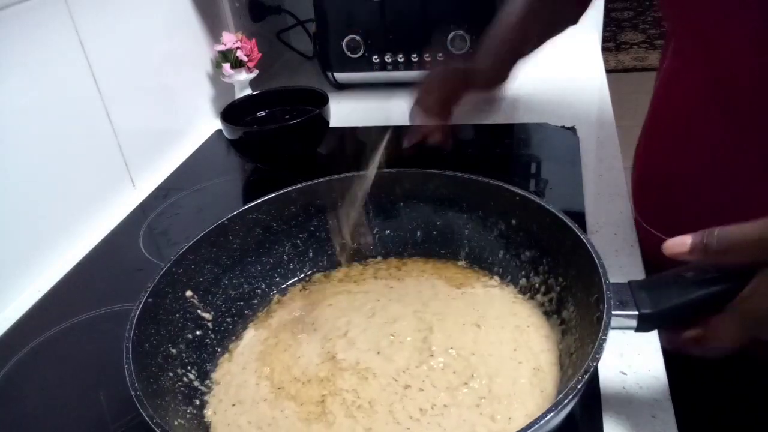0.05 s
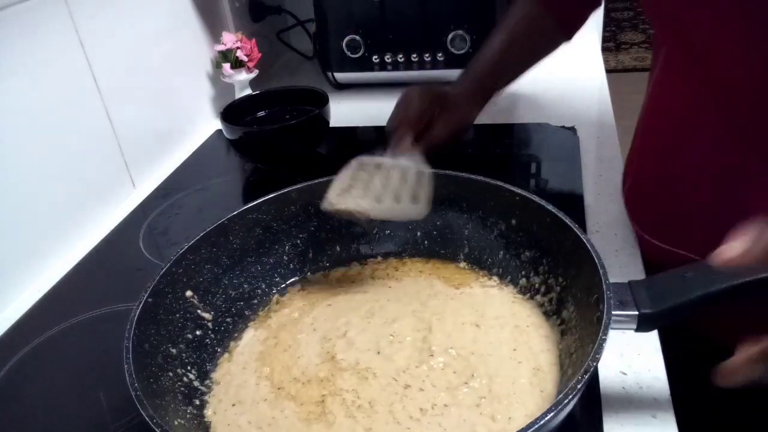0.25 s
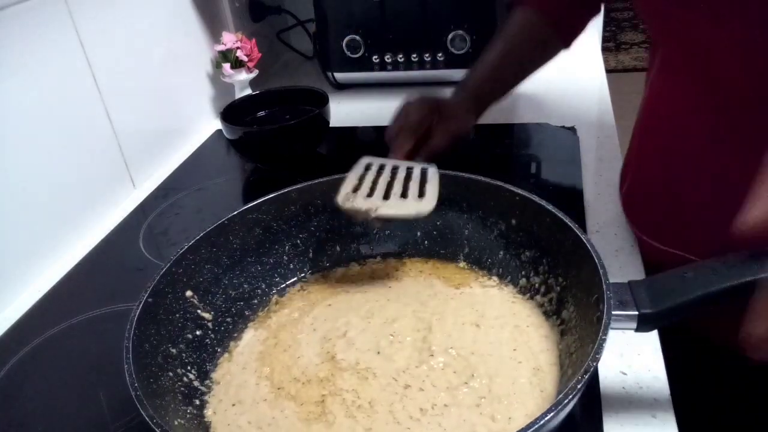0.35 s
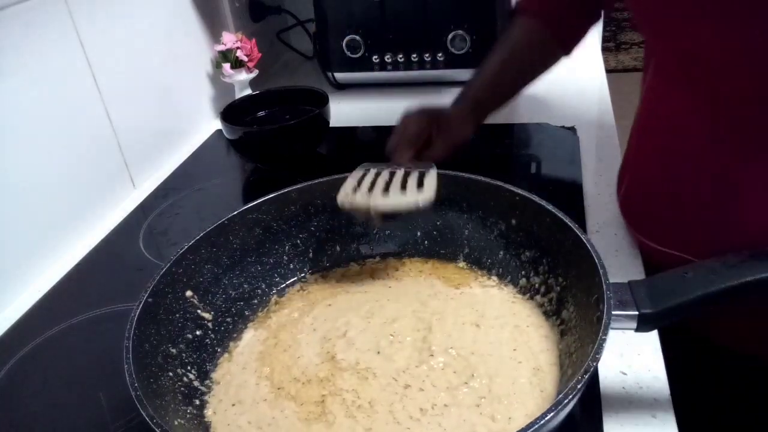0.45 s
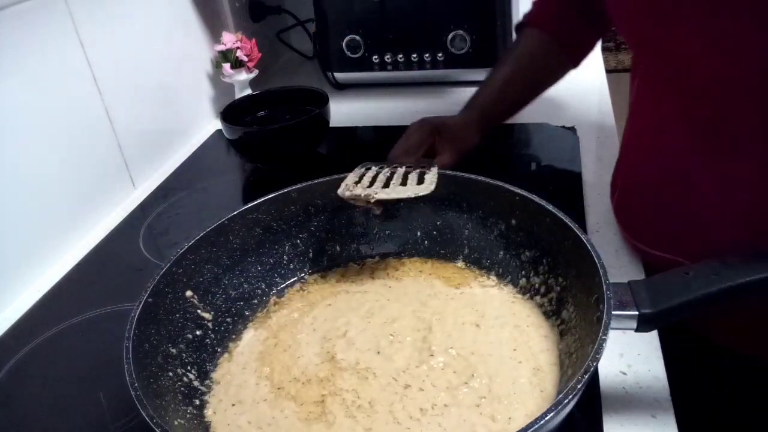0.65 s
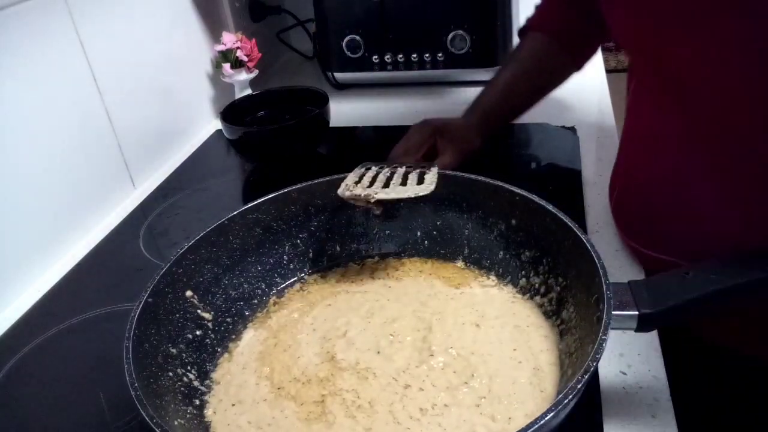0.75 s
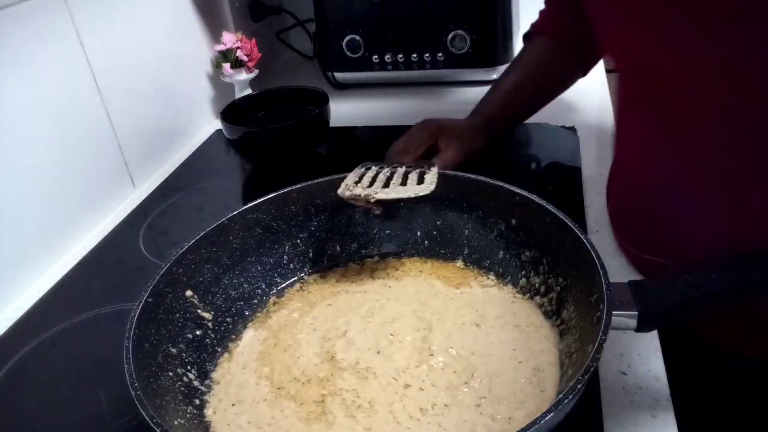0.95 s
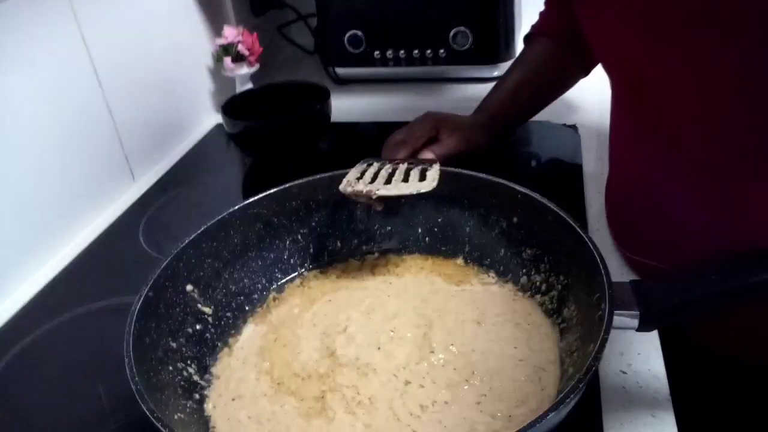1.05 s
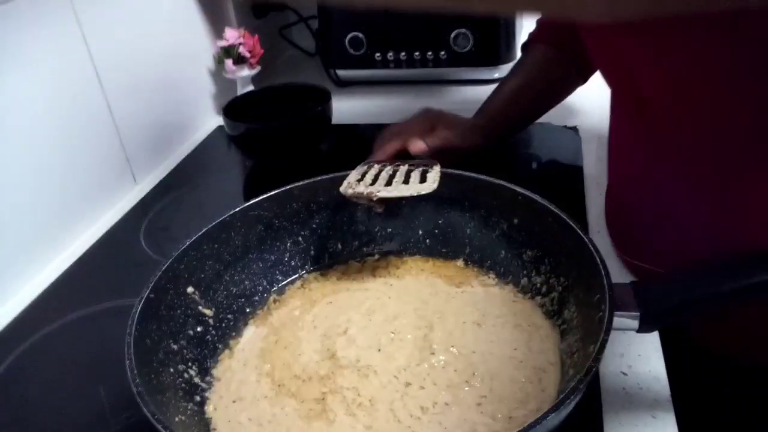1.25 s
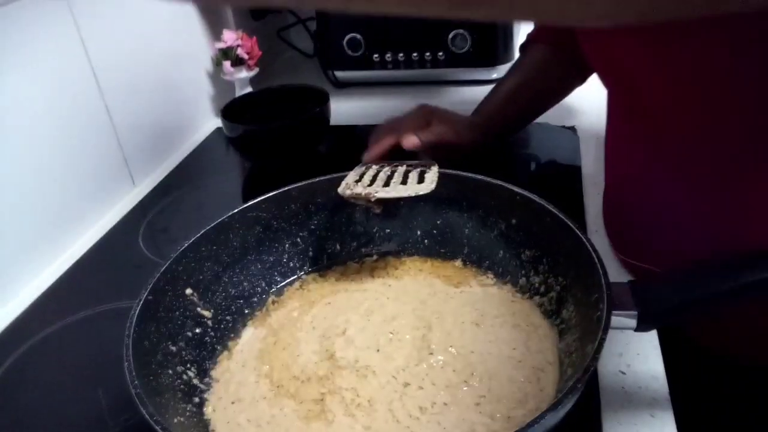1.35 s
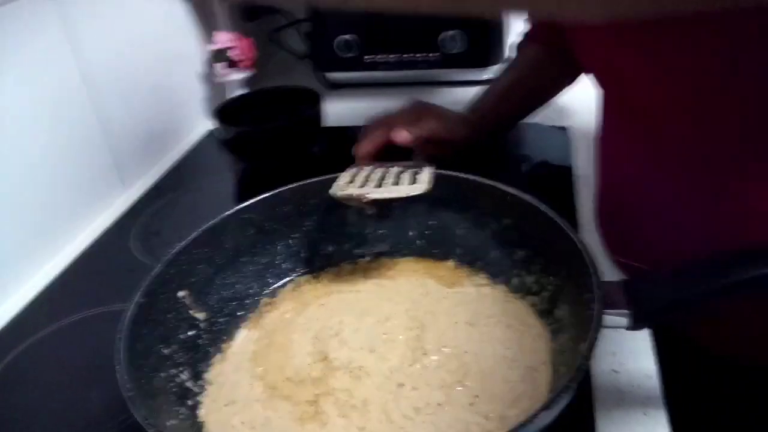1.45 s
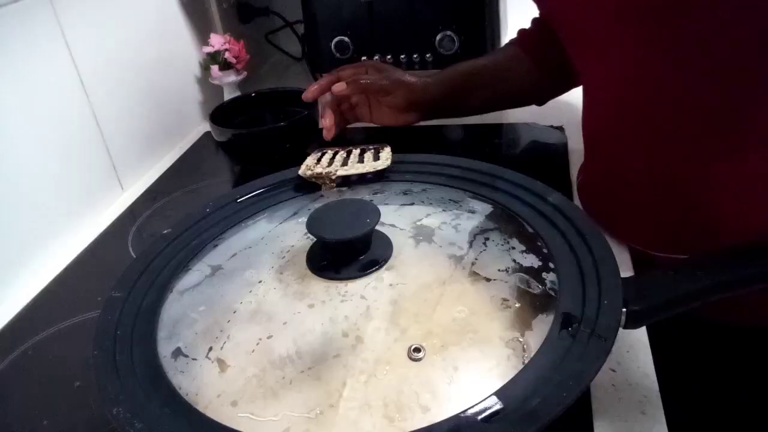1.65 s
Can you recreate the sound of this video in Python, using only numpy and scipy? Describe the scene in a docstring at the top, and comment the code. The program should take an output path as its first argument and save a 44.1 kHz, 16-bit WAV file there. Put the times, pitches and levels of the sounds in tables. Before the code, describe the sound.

Sharp clatter of a steel spatula bouncing on a frying pan rim, followed at once by a bright rattling lid, with soft stovetop thuds; then low kitchen hum and faint touches, heard close with a short room tail.

```python
"""A faint hollow clink opens over mains hum and a thin whine in a kitchen; a steel spatula is laid on a pan's rim
and bounces, its handle clacks, a lid clatters down, and later fingers nudge things.
Each blow rings decaying modes and throws off a grainy noise crack; thuds ring the hob and a low boom swells.
The hum beats with a fan tone over hiss, rumble and wavering tones; an edit at 1.34 s makes the hum jump."""
import sys
import numpy as np
from scipy import signal
from scipy.fft import rfft, irfft
from scipy.io import wavfile

SR = 44100
rng = np.random.default_rng(int(sys.argv[2]) if len(sys.argv) > 2 else 0)


def store_wav(level_fs):
    """Save 16-bit WAV to argv[1]."""
    pcm = np.round(np.clip(np.atleast_2d(level_fs), -1, 1) * 32767)
    wavfile.write(sys.argv[1], SR, pcm.T.astype(np.int16))


def undo_db(level):
    """Turn decibels back into plain size, where 20 dB means ten times bigger."""
    steps = np.asarray(level, float) / 20
    return 10 ** steps


N = 74970
T = np.arange(N) / SR
EDIT_S = 1.3396
AFTER_EDIT = T > EDIT_S

# Crack colour of pan, handle and two light touches: pitch_hz [Hz], relative_db [dB per Hz]
PAN_CRACK = [(180, -30.5), (300, -12), (798, -19.5), (1290, -6), (1630, -22), (2550, -10), (2960, -22.5),
             (5380, -20), (6040, -11.5), (8140, -35), (13000, -50), (15000, -32.5), (15900, -59.5)]
# Crack colour of lid and metal tap: pitch_hz [Hz], relative_db [dB per Hz]
LID_CRACK = [(180, -23.5), (300, -12.5), (432, -12.5), (1110, -11.5), (1870, -16), (3800, -14),
             (4400, -13.5), (4850, -15), (5300, -0.5), (5750, -12), (6450, -1.5), (6800, -9), (7450, -5.5),
             (7700, -15), (12400, -22), (14900, -10.5), (15600, -7), (15900, -50)]


def colour(x, spectrum):
    """Filter x to a spectrum of (Hz, relative dB) points joined over log frequency; rms 1."""
    hz, db = np.array(spectrum, float).T
    f = np.fft.rfftfreq(len(x), 1 / SR) + 1
    gain = undo_db(np.interp(np.log(f), np.log(hz), db, left=-90, right=-90))
    y = irfft(rfft(x) * gain, len(x))
    return y / np.std(y)


def band(centre_hz, width_hz):
    """Noise through a steep resonance whose gain halves at the edges of its width; rms 1."""
    f = np.fft.rfftfreq(N, 1 / SR) + 1
    gain = 1 / (1 + ((f - centre_hz) / (width_hz / 2)) ** 2)
    y = irfft(rfft(rng.standard_normal(N)) * gain, N)
    return y / np.std(y)


def fade(start_s, t60_s, attack_s=0.0003):
    """Quick rise at the start, then exponential decay by 60 dB per t60."""
    since = np.maximum(T - start_s, 0)
    return (1 - np.exp(-since / attack_s)) * np.exp(-np.log(1000) * since / t60_s)


def ring(modes, start_s, level_db, bright_hz, contact_s=0.001):
    """One blow on a set of modes, each wavering against a close twin; a soft blow weakens the high modes."""
    scatter_db, twin_hz, twin_share, longest_t60_s = 4, 20, .25, .3
    hz, mode_db, t60_s = np.array(modes, float).T[:, :, None]
    start = int(start_s * SR)
    since = np.arange(min(N - start, SR // 2)) / SR
    gain = undo_db(level_db + mode_db + scatter_db * rng.standard_normal(hz.shape))
    gain = gain / (1 + (hz / bright_hz) ** 2)
    # the twin's random detuning has this spread at 1 kHz and grows with the root of pitch
    twin = hz + twin_hz * np.sqrt(hz / 1000) * rng.standard_normal(hz.shape)
    tone = np.sin(2 * np.pi * hz * since) + twin_share * np.sin(2 * np.pi * twin * since)
    decay = np.exp(-np.log(1000) * since / np.minimum(t60_s, longest_t60_s))
    onset = 1 - np.exp(-(since / contact_s) ** 2)
    out = np.zeros(N)
    out[start:start + len(since)] = np.sum(gain * tone * decay, 0) * onset
    return out


def clatter(blows, modes, crack_colour):
    """Each blow rings the modes and throws off a crack of coloured noise with random grain."""
    grain_db = 1.5
    out = 0
    for start_s, ring_db, crack_db, bright_hz, t60_s in blows:
        grain = undo_db(grain_db * np.repeat(rng.standard_normal(N // 64 + 1), 64)[:N])
        noise = colour(grain * rng.standard_normal(N), crack_colour)
        noise = signal.lfilter(*signal.butter(1, min(bright_hz, 20000), fs=SR), noise)
        crack = undo_db(crack_db) * noise * fade(start_s, t60_s)
        out = out + ring(modes, start_s, ring_db, bright_hz) + crack
    return out


def spatula_on_pan():
    """The spatula bounces on the rim, ringing the modes of pan and spatula."""
    # Mode pitches: pitch_hz [Hz]
    pan_hz = [920, 1019, 1150, 1275, 1757, 2150, 2237, 2509, 2715, 3135, 3774, 4145, 4450, 5992, 6700, 7321,
              8909, 10830]
    # Those modes, decay capped in ring(): relative_db [dB], t60_s [s]
    pan_modes = [(-15.5, 0.047), (-8, 0.078), (-4, 0.1), (-3.5, 0.24), (-7.5, 0.16), (-2, 0.1),
                 (-7.5, 0.37), (-0.5, 0.16), (-3.5, 0.11), (-21, 0.082), (-12.5, .11), (-6.5, .12),
                 (-18, 0.053), (-2.5, 0.077), (-16, 0.18), (-18, 0.095), (-32, .1), (-30, 0.081)]
    # Blows: start_s [s], ring_db [dB], crack_db [dB], bright_hz [Hz], crack_t60_s [s]
    pan_blows = [(.2185, -23, -23, 12050, 0.034), (.2222, -35, -18.5, 12000, 0.04),
                 (.3085, -44, -29.5, 2547, 0.084), (.3135, -42.5, -40, 5000, 0.12),
                 (.336, -41.5, -38.5, 1200, 0.069)]
    return clatter(pan_blows, np.c_[pan_hz, pan_modes], PAN_CRACK)


def spatula_handle():
    """The handle clacks as the spatula rocks, ringing a few middle modes."""
    # Modes: pitch_hz [Hz], relative_db [dB], t60_s [s]
    handle_modes = [(650, -8, .08), (785, 0, .14), (1040, -4, .12), (1130, -2, .08), (1770, -6, .09)]
    # Rocks: start_s [s], ring_db [dB], crack_db [dB], bright_hz [Hz], crack_t60_s [s]
    rocks = [(.3085, -40, -49, 5006, .03), (.335, -41.5, -53, 5000, 0.041)]
    return clatter(rocks, handle_modes, PAN_CRACK)


def lid():
    """The lid clatters down in quick blows that ring its dense high modes."""
    # Mode pitches: pitch_hz [Hz]
    lid_hz = [1040, 1120, 2700, 3200, 4459, 5230, 5327, 5459, 6334, 6391, 6455, 6513, 6867, 7007, 7137,
              7450, 14600, 15100]
    # Those modes, decay capped in ring(): relative_db [dB], t60_s [s]
    lid_modes = [(-17, 0.22), (-14.5, 0.078), (-23, .3), (-23.5, 0.33), (-4, 0.11), (-8, 0.13),
                 (-7.5, 0.067), (-15.5, 0.06), (-9.5, .2), (-8.5, .2), (-9, 0.28), (0.5, 0.088),
                 (-14, 0.23), (-9, .15), (-4.5, 0.065), (-9, 0.13), (-15, .1), (-14, .1)]
    # Blows: start_s [s], ring_db [dB], crack_db [dB], bright_hz [Hz], crack_t60_s [s]
    lid_blows = [(.4028, -34.5, -18, 12000, 0.035), (.406, -21.5, -17, 12000, 0.067),
                 (.4115, -28, -24.5, 12000, .1), (.421, -45.5, -27, 12000, 0.22),
                 (.437, -41.5, -22.5, 12000, .08), (.4435, -39.5, -27.5, 12000, .12),
                 (.458, -44, -36, 9000, 0.088)]
    return clatter(lid_blows, np.c_[lid_hz, lid_modes], LID_CRACK)


def hob_thuds():
    """Soft, slow contacts ring the glass hob under the pan, thinned by the microphone's low cut."""
    mic_low_hz = 60
    # Plate modes, decay capped in ring(): pitch_hz [Hz], relative_db [dB], t60_s [s]
    hob_modes = [(73.48, -4.5, .12), (168.3, -0.5, 0.22), (275.4, -8, 0.36), (344.2, -15, .25),
                 (509, -12.5, 0.5)]
    # Thuds: start_s [s], level_db [dB], bright_hz [Hz]
    thud_rows = [(0.2197, -23, 400), (0.3081, -35.5, 1500), (0.3176, -26, 300), (.408, -30, 500),
                 (0.4367, -30.5, 305)]
    thuds = sum(ring(hob_modes, *row, contact_s=0.0037) for row in thud_rows)
    low_cut = signal.butter(2, mic_low_hz, "high", fs=SR, output="sos")
    return signal.sosfilt(low_cut, thuds)


def low_boom():
    """A low boom near 106 Hz swells after a blow and is stopped by the next."""
    pitch_hz, swell_s, t60_s = 106.03, 0.011, 0.48
    # Booms: start_s [s], level_db [dB]
    booms = [(.219, -21.5), (0.317, -24), (0.414, -27.5)]
    out = 0
    for start_s, level_db in booms:
        # damping of the earlier boom sets in 3.8 ms before the new one
        damping = np.exp(-np.maximum(T - start_s + 0.0038, 0) / .008)
        swell = undo_db(level_db) * fade(start_s, t60_s, swell_s)
        out = out * damping + swell * np.sin(2 * np.pi * pitch_hz * (T - start_s))
    return out


def light_touches():
    """Small things touched lightly: a hollow clink, a dull knock and a thin metal tap, each with its modes."""
    # Modes, decay capped in ring(): pitch_hz [Hz], relative_db [dB], t60_s [s]
    clink_modes = [(850, -4, .06), (995, 3, .3), (1240, -4, .05), (1490, -6, .08), (1900, -4, .1),
                   (2150, -2, .06), (2340, -3, .07), (4700, -10, .08), (6330, -12, .12)]
    knock_modes = [(160, -3, .12), (205, 0, .06), (454, -14, .06), (575, -9, .08), (1300, -27, .15),
                   (2150, -33, .2), (3100, -29, .1)]
    tap_modes = [(1300, -3, .04), (1540, -12, .2), (2120, -7, .2), (2750, -4, .2), (3250, -14, .2),
                 (3800, -9, .1), (4240, -2, .15), (4710, -2, .12), (5152, -5, .06), (5880, -5, .08),
                 (6890, -9, .1)]
    # Touches: start_s [s], ring_db [dB], crack_db [dB], bright_hz [Hz], crack_t60_s [s]
    clinks = [(.008, -57, -52, 9250, .08)]
    knocks = [(1.559, -42, -68.5, 8810, 0.13), (1.565, -50, -73, 9000, 0.044),
              (1.577, -58.5, -71, 9000, 0.055)]
    taps = [(1.653, -59.5, -65.5, 11850, 0.15), (1.663, -72.5, -70, 12000, .08)]
    out = clatter(clinks, clink_modes, PAN_CRACK)
    out = out + clatter(knocks, knock_modes, PAN_CRACK)
    return out + clatter(taps, tap_modes, LID_CRACK)


def ticks():
    """Faint ticks: short bursts of resonant noise."""
    # Ticks: start_s [s], level_db [dB], centre_hz [Hz], width_hz [Hz], t60_s [s]
    tick_rows = [(.838, -66.5, 8000, 8010, 0.056), (.954, -66, 2524, 3000, 0.021),
                 (1.051, -60, 5990, 12000, .01), (1.063, -72, 5900, 12000, .01),
                 (1.288, -61.5, 7100, 2500, 0.036), (1.292, -61, 6500, 3980, 0.015)]
    out = 0
    for start_s, level_db, centre_hz, width_hz, t60_s in tick_rows:
        out = out + undo_db(level_db) * band(centre_hz, width_hz) * fade(start_s, t60_s)
    return out


def room(x):
    """Diffuse kitchen tail of decaying noise, the treble dying first."""
    t60_s, treble_t60_s, room_db = 0.43, 0.083, -15
    noise = rng.standard_normal(N)
    low = signal.lfilter(*signal.butter(2, 7000, fs=SR), noise)
    tail = low * fade(0.0013, t60_s, .004) + (noise - low) * fade(0.012, treble_t60_s, .004)
    tail = tail[:SR // 2]
    tail = tail / np.sqrt(np.sum(tail ** 2))
    return x + undo_db(room_db) * signal.fftconvolve(x, tail)[:N]


def whine():
    """A thin, slightly rough tone that swells and sags in level and pitch, and stops at the edit."""
    # Course of the whine: time_s [s], pitch_hz [Hz], level_db [dB rms before roughness]
    whine_course = [(0, 5150, -90), (.15, 5150, -88), (.7, 5240, -83.5), (.9, 5177, -95),
                    (1.05, 5210, -77.5), (1.13, 5130, -83.5), (1.209, 5150, -76.5), (1.33, 5125, -87.5)]
    time_s, pitch_hz, level_db = np.array(whine_course).T
    rough = 1 + .5 * band(30, 60)
    phase = 2 * np.pi * np.cumsum(np.interp(T, time_s, pitch_hz)) / SR
    level = np.sqrt(2) * undo_db(np.interp(T, time_s, level_db))
    return level * rough * np.sin(phase) * (T < EDIT_S)


def whistle():
    """A second thin tone in fits: narrow noise with a flickering level, weaker after the edit."""
    # Tone: centre_hz [Hz], width_hz [Hz], before_db and after_db the edit [dB], flicker_db [dB rms]
    whistle_row = (6060, 51, -81, -96, 4)
    centre_hz, width_hz, before_db, after_db, flicker_db = whistle_row
    level_db = np.where(AFTER_EDIT, after_db, before_db) + flicker_db * band(3.6, 15)
    return undo_db(level_db) * band(centre_hz, width_hz)


def wavering_tones():
    """Narrow bands of noise, heard as unsteady tones."""
    # Tones: centre_hz [Hz], width_hz [Hz], level_db [dB rms]
    waver_rows = [(150.65, 12, -61.5), (175.5, 25, -72.5), (575.4, 25, -85.5), (6170, 100, -85),
                  (6820, 670, -84.5)]
    return sum(undo_db(level_db) * band(centre_hz, width_hz) for centre_hz, width_hz, level_db in waver_rows)


def hum():
    """Mains hum and its overtone beat with a fan tone; the edit skips their clock ahead and raises the fan."""
    mains_hz, fan_hz, fan_later_hz = 100.06, 115.5, 117.8
    mains_db, overtone_db, fan_db = -43.5, -73, -54.5  # rms
    in_step_s, skipped_s = 1.3412, .0351
    # on the skipping clock all three tones peak together at in_step_s
    clock = 2 * np.pi * (T + skipped_s * AFTER_EDIT - in_step_s)
    mains = undo_db(mains_db) * np.cos(mains_hz * clock)
    overtone = undo_db(overtone_db) * np.cos(2 * mains_hz * clock)
    fan = undo_db(fan_db) * np.cos(np.where(AFTER_EDIT, fan_later_hz, fan_hz) * clock)
    return np.sqrt(2) * (mains + overtone + fan)


def hiss():
    """Faint coloured noise, 3 dB louder after the edit."""
    # Colour: pitch_hz [Hz], relative_db [dB]
    hiss_colour = [(120, -29.5), (200, 0.5), (269, -20), (389, -18.5), (573, -15.5), (640, -23), (926, -28),
                   (4530, -31), (5980, -22), (8650, -38.5), (13500, -43.5), (15000, -26.5), (16500, -52.5)]
    return undo_db(-71.5 + 3 * AFTER_EDIT) * colour(rng.standard_normal(N), hiss_colour)


def rumble():
    """Steady low coloured noise."""
    # Colour: pitch_hz [Hz], relative_db [dB]
    rumble_colour = [(20, -12.5), (50, -7), (80, 0), (130, 5), (200, -10), (300, -24.5)]
    return undo_db(-61) * colour(rng.standard_normal(N), rumble_colour)


def scene():
    """Blows and touches in the room, thuds and boom without it, over the background."""
    hits = spatula_on_pan() + spatula_handle() + lid() + light_touches() + ticks()
    background = whine() + whistle() + wavering_tones() + hum() + hiss() + rumble()
    return (room(hits) + hob_thuds() + low_boom() + background)[None]


def top_cut(x):
    """Nothing passes above the cut-off."""
    return signal.sosfilt(signal.butter(12, 16690, fs=SR, output="sos"), x)


def record(dry):
    """The finished mix as the phone delivers it."""
    return top_cut(dry)


dry = scene()
out = record(dry)
store_wav(out)
```